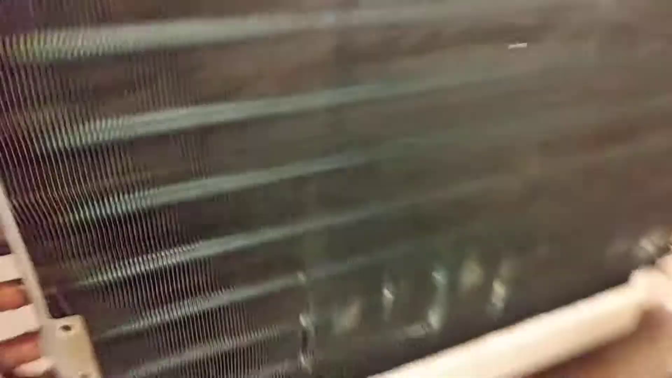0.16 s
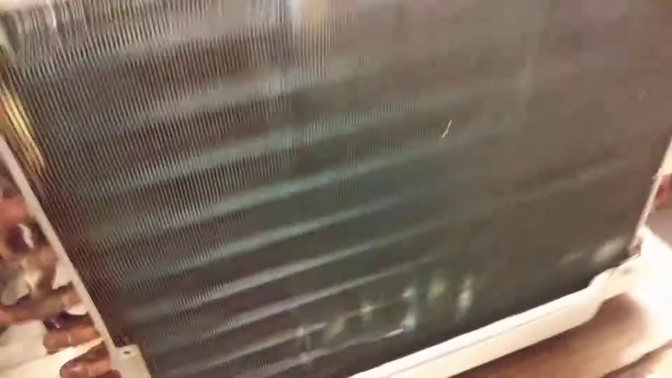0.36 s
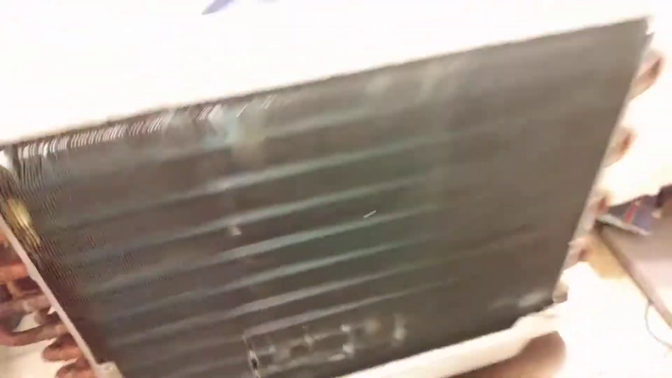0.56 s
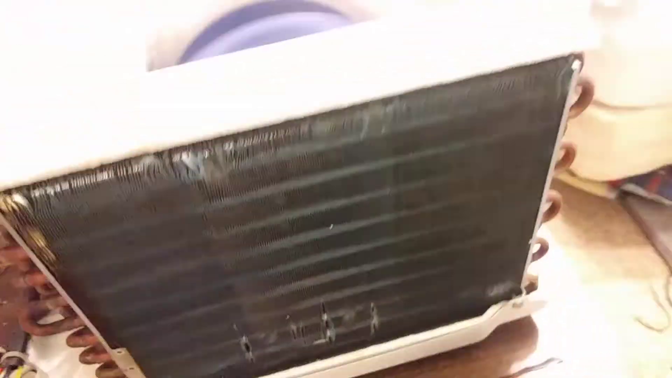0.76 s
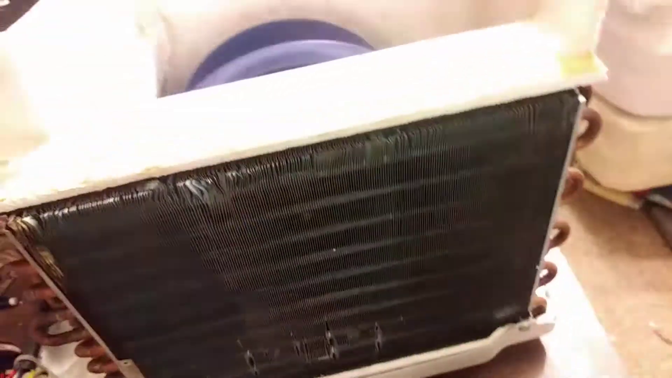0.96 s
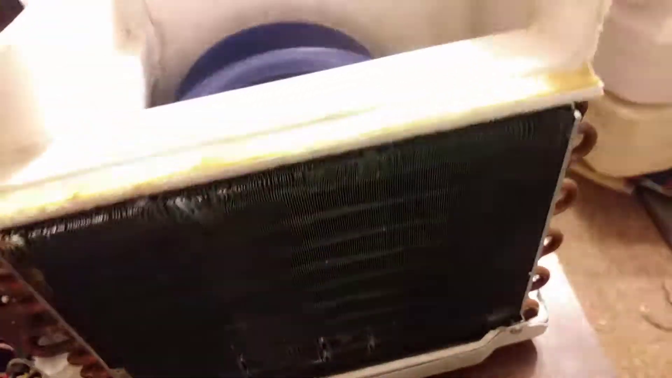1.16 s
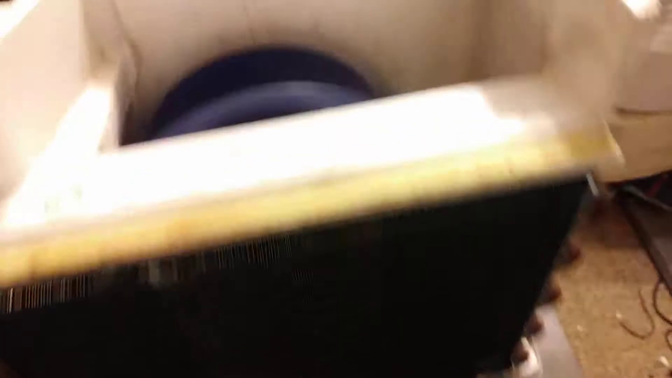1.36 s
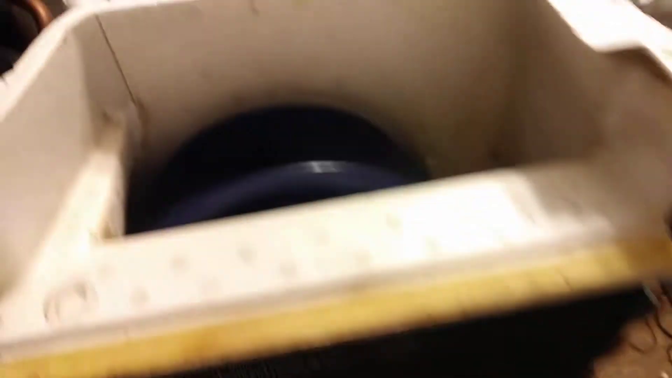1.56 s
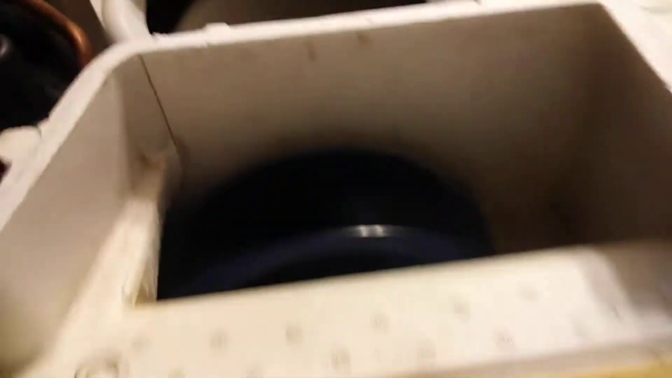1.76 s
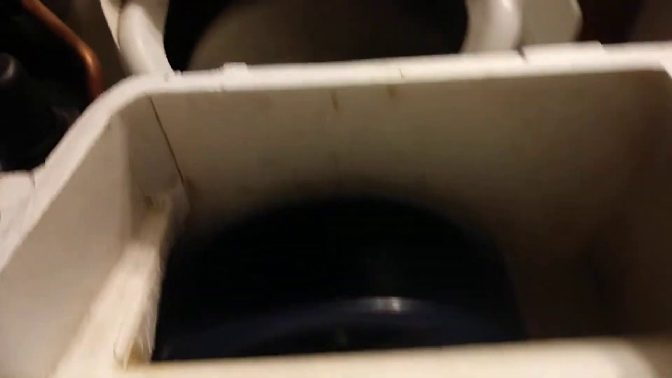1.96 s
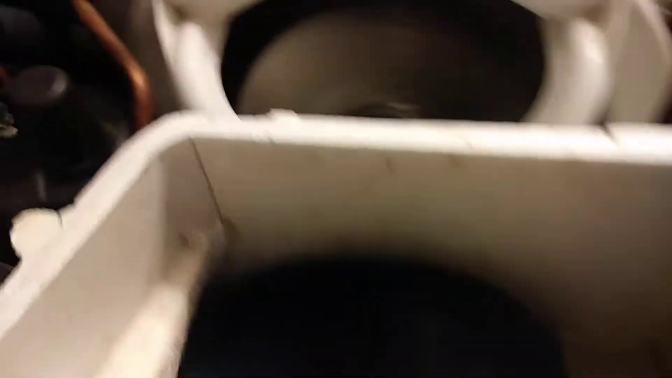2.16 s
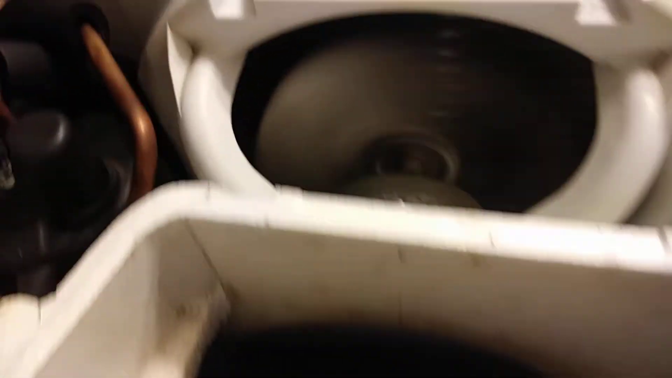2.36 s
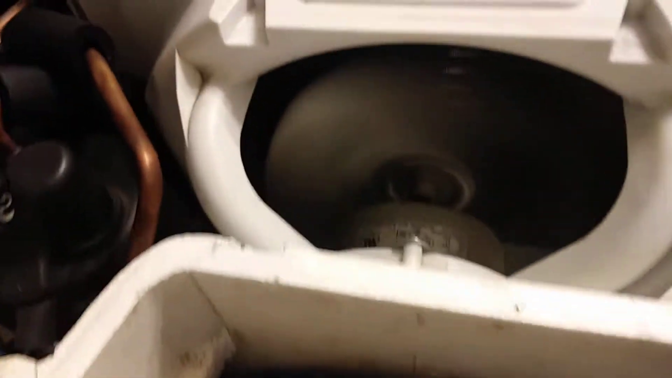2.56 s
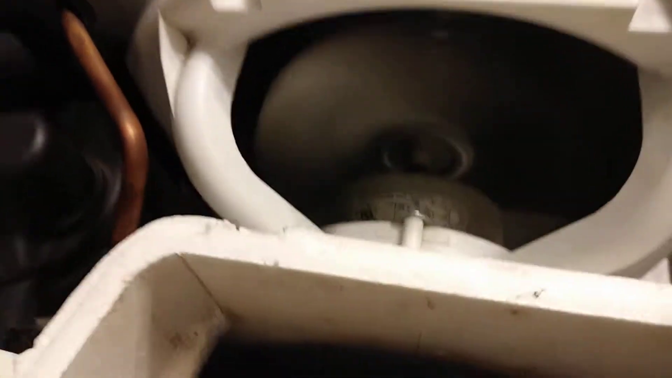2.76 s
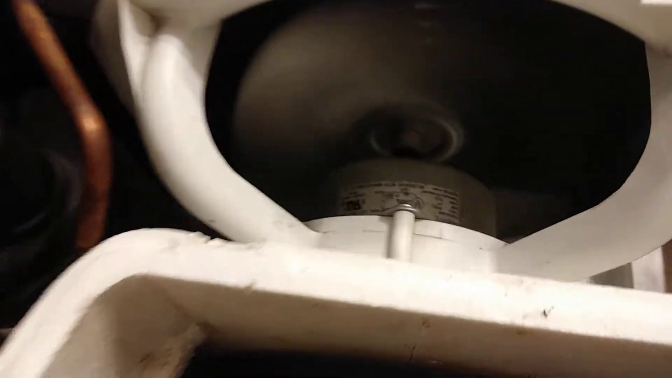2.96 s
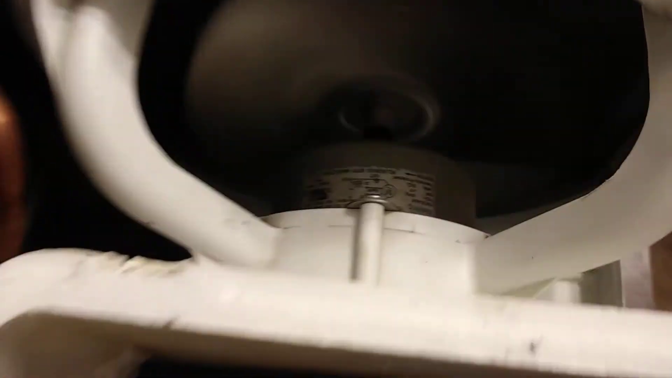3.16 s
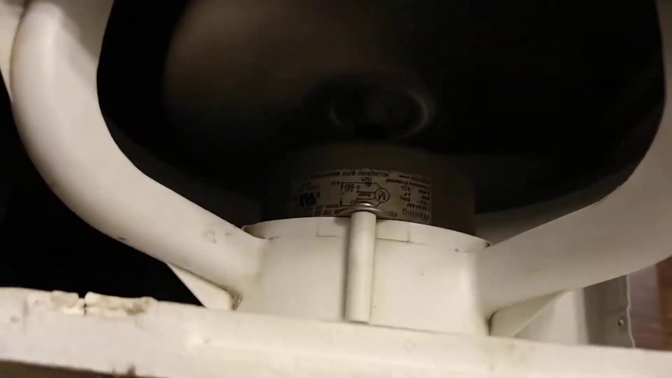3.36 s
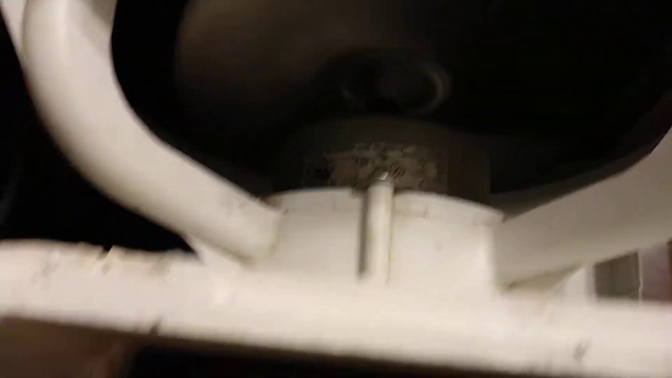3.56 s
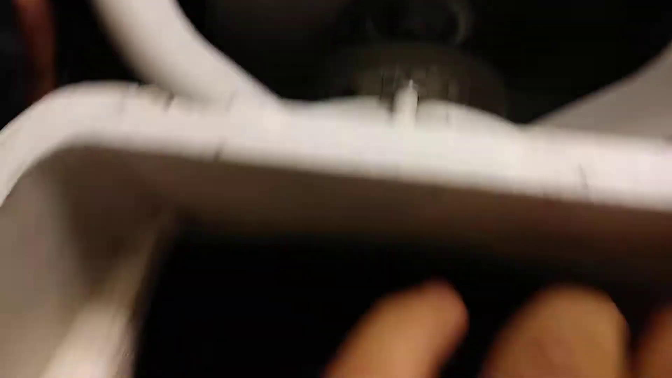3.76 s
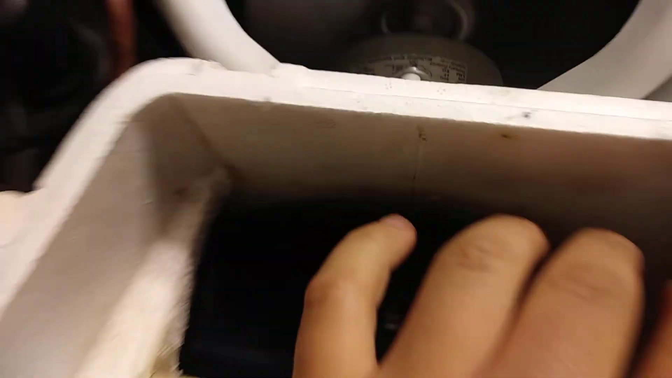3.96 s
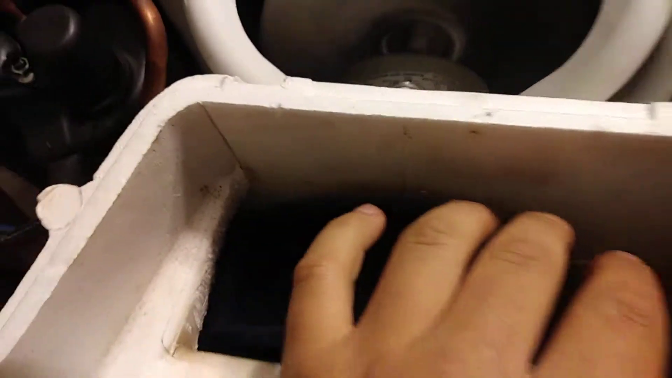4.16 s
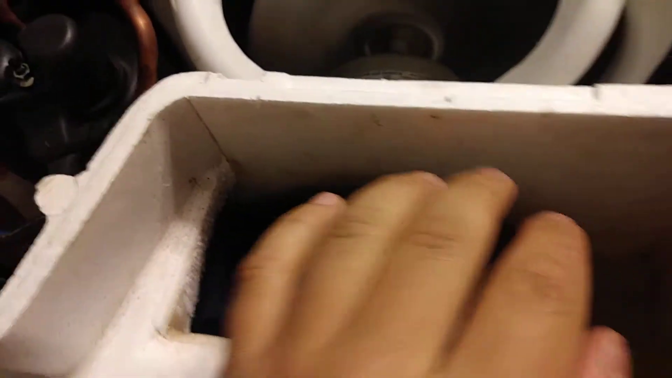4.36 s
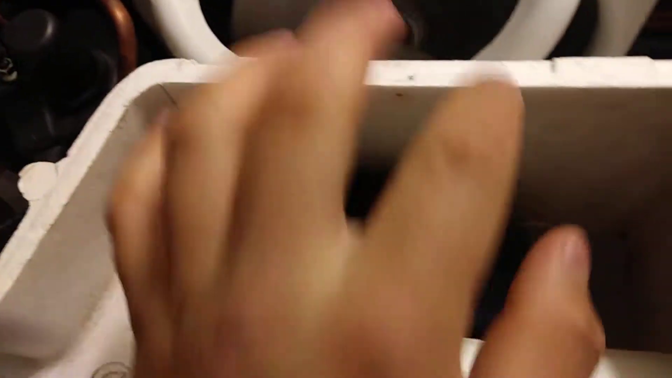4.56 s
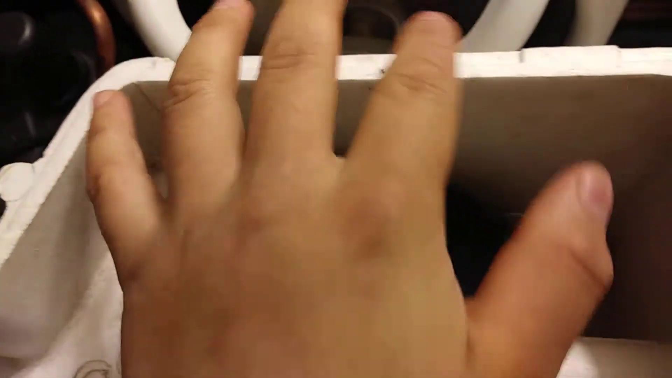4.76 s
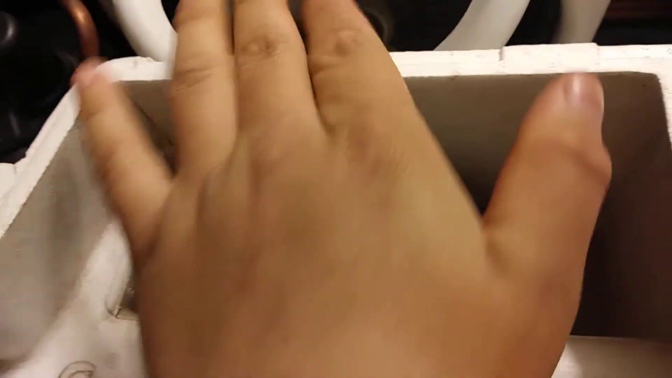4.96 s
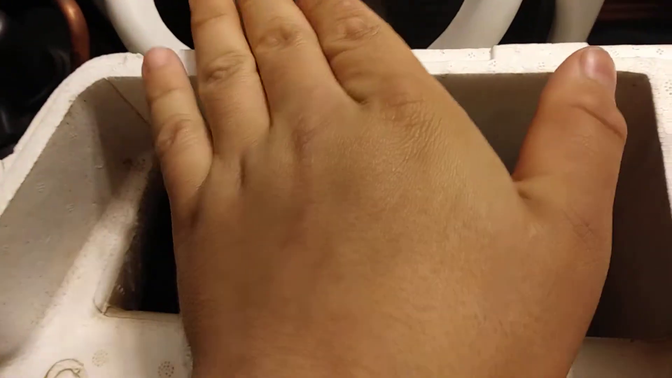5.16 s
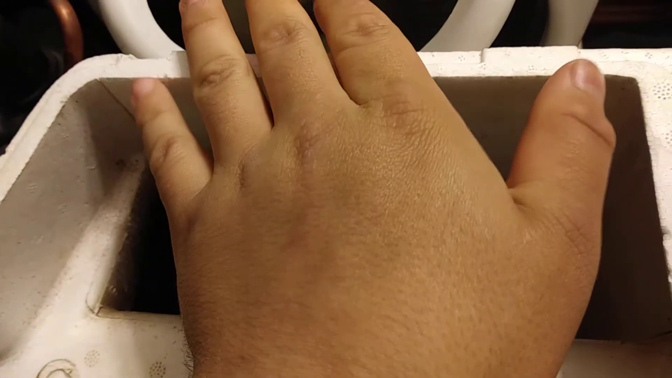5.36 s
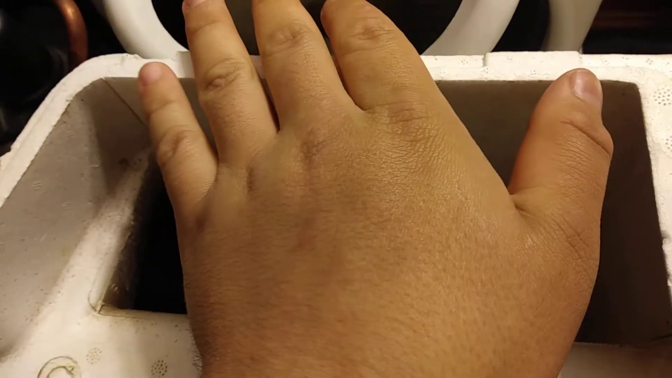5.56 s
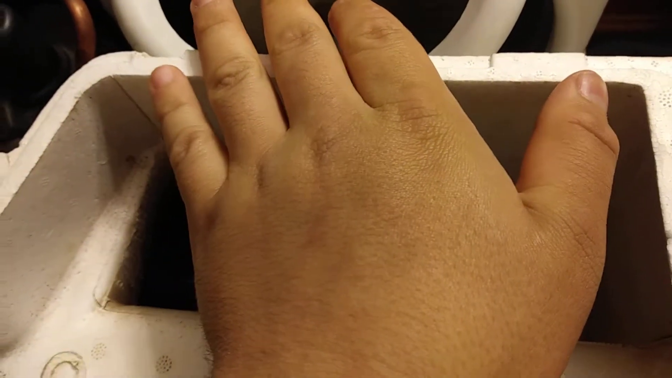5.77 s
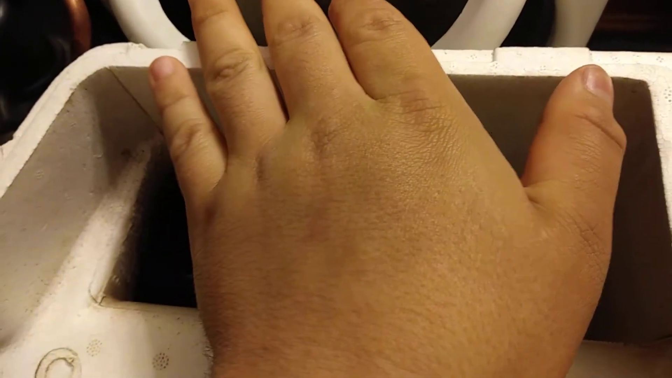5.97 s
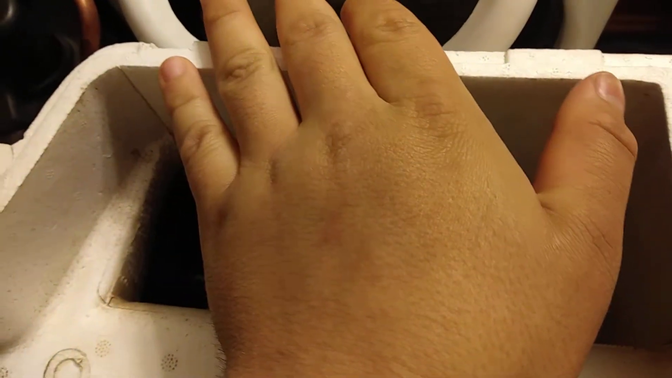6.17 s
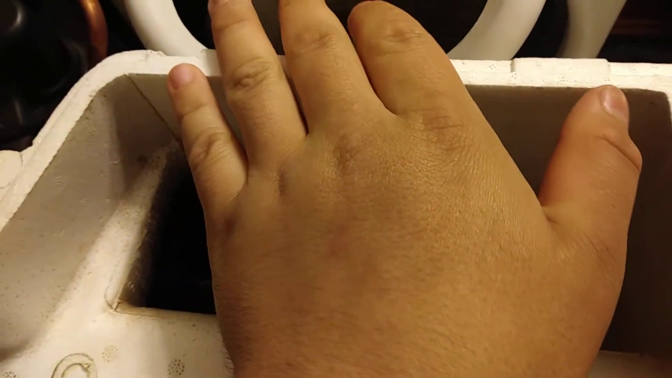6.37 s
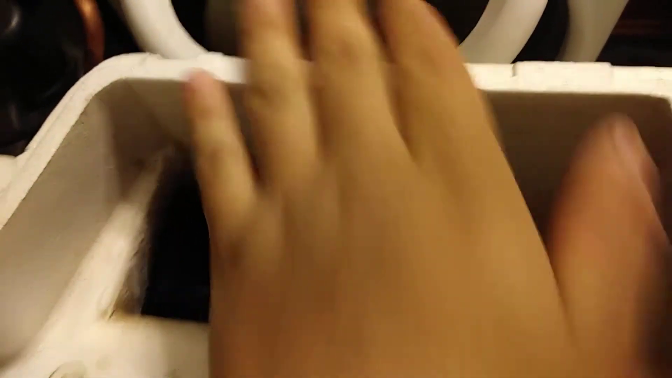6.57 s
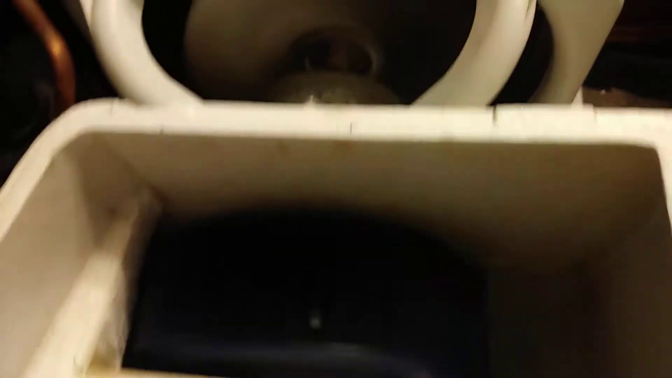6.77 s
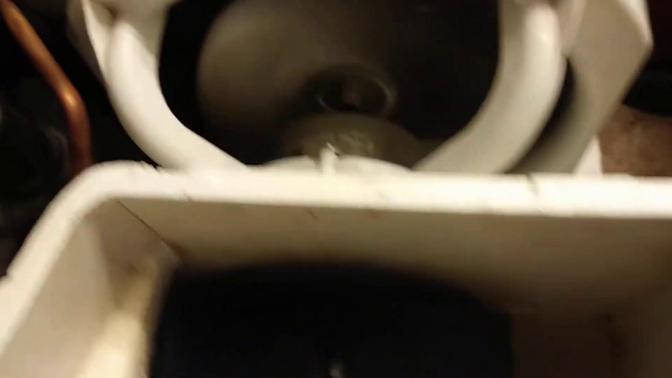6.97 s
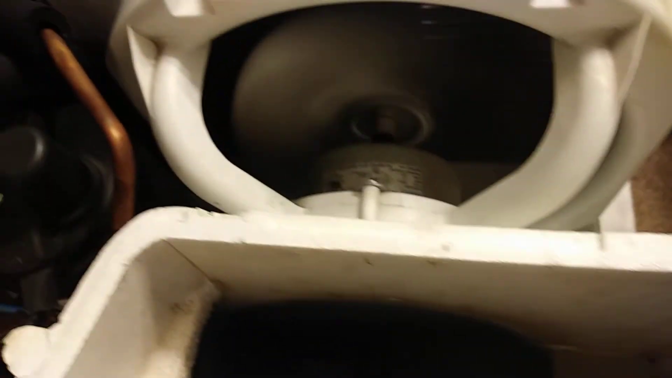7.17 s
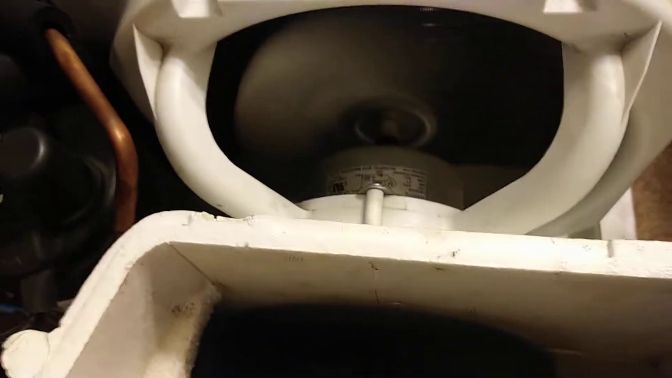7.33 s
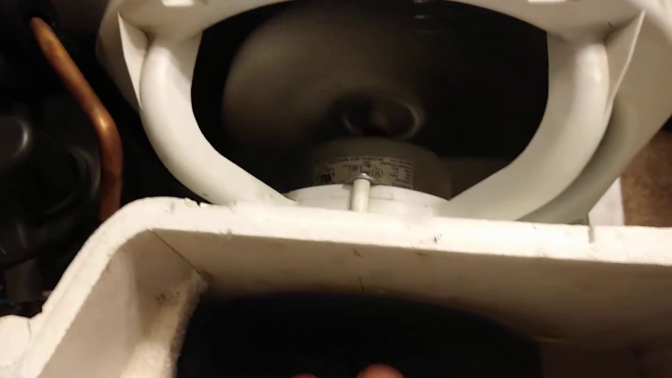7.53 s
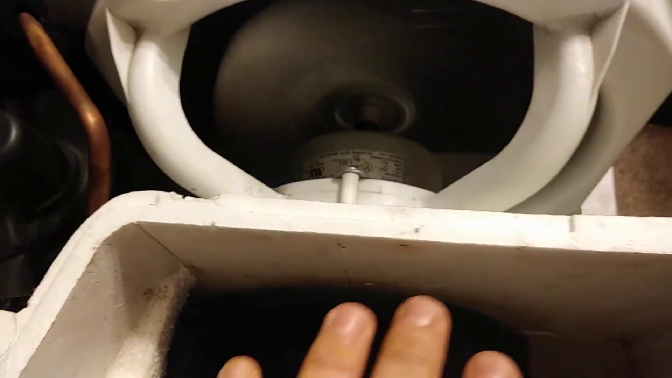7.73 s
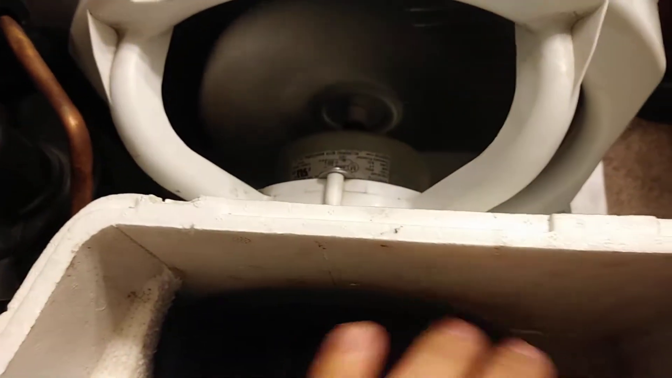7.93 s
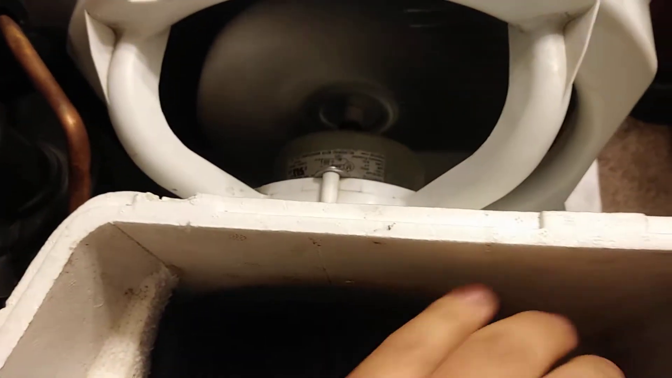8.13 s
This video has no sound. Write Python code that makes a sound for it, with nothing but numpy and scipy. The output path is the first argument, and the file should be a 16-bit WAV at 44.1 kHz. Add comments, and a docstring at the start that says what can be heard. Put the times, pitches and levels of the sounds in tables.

```python
"""An opened window air conditioner runs in a small room: knocks ring its casing, sines hum, noise hisses.
From 2.5 s the microphone dips into the blower's jet: gusts of shaped noise thump, roar and drive a limiter.
Near 6.5 s a hand covers the outlet, so the hiss drops, then slides off the plastic in two noise strokes.
From 7 s the jet buffets the microphone again, more weakly; the machine runs on to the end."""
import sys
import numpy as np
from scipy import signal
from scipy.fft import rfft, irfft, next_fast_len
from scipy.io import wavfile
from scipy.ndimage import uniform_filter1d, minimum_filter1d, map_coordinates

SR = 44100
rng = np.random.default_rng(int(sys.argv[2]) if len(sys.argv) > 2 else 0)


def dump_mix(stems):
    """Bounce the given channels to the path in sys.argv[1] as a 16-bit WAV at rate SR."""
    frames = np.atleast_2d(stems).T  # one column per channel
    limited = np.clip(frames, -1, 1)  # hard clip at full scale
    pcm = np.round(limited * 32767).astype(np.int16)
    wavfile.write(sys.argv[1], SR, pcm)


N = 366030
T = np.arange(N) / SR
SHAFT_HZ = 58.65
TURNS = np.arange(int(N / SR * SHAFT_HZ) + 1)

# "coil", "rim", "blower": levels beside the coil, over the rim, above the blower. All levels are relative.
# microphone path: (time [s], place [0 coil, 1 rim, 2 blower])
MIC_PATH = [(.3, 0.3), (1.05, 0.65), (1.4, 0.8), (1.65, 1.16), (2.1, 1.55), (4.2, 1.76), (5.5, 1.84),
            (6.6, 1.97), (7, 1.67), (8.25, 1.92)]
# hiss level, lower off the fins and under the hand; each source scales it: (time [s], level [dB])
FACING = [(0, -3.5), (.35, -11.5), (1.35, -8.5), (2.2, -1.5), (2.9, -7.5), (4.45, -3.5), (5.1, -6.5),
          (6.3, -8.5), (6.9, -3.5), (7.5, -4), (8.25, -7)]

# lighter knocks within a compressor turn: (place [turn], coil [dB], rim [dB], blower [dB])
KNOCKS = [(0.089, -12, -7.5, -4.5), (.185, 6, 1, 2), (0.268, -9, 1, -10.5), (.35, 2.5, -4, 0),
          (0.503, -3, -4, -2.5), (0.666, 1, 1, -3.5), (0.857, -16.5, -6, -7)]
# casing resonances: (centre [Hz], width [Hz], coil [dB], rim [dB], blower [dB])
CASING_MODES = [(1341, 330, -42, -28, -30.6), (1528, 153, -47.5, -38.5, -33.5),
                (1730, 147, -50, -47.5, -37), (2110, 35, -60, -58, -48), (2200, 80, -50, -52, -44),
                (2275, 65, -44, -47, -54), (2660, 90, -53, -51, -52), (3460, 200, -52, -52.5, -64)]
# broad compressor clatter: (frequency [Hz], density [dB per Hz])
CLATTER_SPECTRUM = [(80, -61), (150, -26), (240, -25.5), (400, 1.5), (580, 4.5), (730, -3.5), (1000, 5.5),
                    (1950, -2.5), (2700, -6), (3800, -18.5), (4900, -17), (6500, -33), (9000, -43.5),
                    (15000, -57)]
# shell resonances, each struck once a turn at its own place in the turn: (place [turn], centre [Hz], width
# [Hz], coil [dB], rim [dB], blower [dB])
SHELL_MODES = [(.205, 961, 224, -24.5, -34, -29.5), (.21, 968, 60, -42, -50, -37),
               (.59, 1019, 253, -42, -36, -38.5), (.2, 845, 90, -34, -45, -52),
               (.2, 700, 90, -42, -52, -55), (.2, 1500, 90, -52, -48, -38), (.1, 1705, 220, -50, -44, -31),
               (.22, 2246, 160, -42, -55, -56)]
# stroke timing: alternate turns early and late, random scatter, slow drift
LIMP_S, JITTER_S, DRIFT_S = 0.00012, 0.00013, 0.00019
# discharge valve: place in the turn, half length, levels at coil, rim and blower
VALVE_PLACE_TURN, VALVE_HALF_S, VALVE_DB = 0.057, 0.00071, (-54, -53, -43.5)
# valve gas: (frequency [Hz], density [dB per Hz])
VALVE_SPECTRUM = [(1900, -2), (2500, 1), (4200, -3.5), (6500, -16), (9500, -39)]
# compressor hum: (multiple of shaft speed, coil [dB], rim [dB], blower [dB])
HUM_LINES = [(4, -54, -61, -61), (7, -43, -49.5, -52), (8, -48, -55, -53), (9, -56, -47, -46),
             (10, -55, -42, -39.5), (11, -48, -50, -50), (14, -44, -43, -49), (16, -52, -52, -45.5)]
# narrow fan whines: (centre [Hz], width [Hz], coil [dB], rim [dB], blower [dB])
FAN_WHINES = [(544, 6.6, -45, -49.5, -52), (954, 14, -34, -43.5, -41)]
# air through the fins: (frequency [Hz], density [dB per Hz])
FAN_SPECTRUM = [(80, -39.5), (130, -33), (170, -17.5), (260, 3), (600, 7.5), (1000, 12.5), (1500, 15.5),
                (2000, 4), (3000, 1), (4000, -6), (5200, -9.5), (6600, -17), (8000, -20), (10000, -41),
                (13000, -36), (15700, -63)]

# stays in the jet: (enter [s], leave [s], buffeting level [dB])
JET_PASSES = [(2.492, 3.188, -20), (3.378, 3.508, -24.5), (3.64, 3.86, -21), (4.31, 4.326, -39.5),
              (5.175, 5.208, -44.5), (7.02, 7.816, -27.5)]
JET_RISE_DB_PER_S, JET_FALL_DB_PER_S = 88, 72
# brushes with the jet's fast core: (time [s], half length [s], air speed [0-1])
JET_CORES = [(2.969, 0.33, 0.76), (3.398, 0.024, 0.96), (3.674, 0.13, 0.67)]
# flow stalls: (time [s], half length [s], depth [dB])
FLOW_STALLS = [(2.456, .01, 16), (2.497, 0.014, 13), (2.579, 0.0051, 22), (2.638, 0.0087, 5),
               (2.709, 0.011, 12), (2.856, 0.0036, 12), (2.98, 0.0024, 12), (3.18, 0.0037, 11),
               (3.259, 0.02, 13), (3.328, 0.018, 17), (3.423, 0.028, 7.5), (3.55, 0.008, 11),
               (3.753, 0.0085, 5), (3.83, 0.011, 8), (7.055, 0.065, 6), (7.145, 0.0077, 19),
               (7.27, 0.019, 6), (7.328, 0.0083, 7), (7.455, .018, 7), (7.576, 0.0087, 5),
               (7.674, 0.014, 4), (7.72, 0.0072, 6), (7.777, 0.014, 10), (7.827, .01, 7)]
# eddies hitting the microphone: (time [s], peak [dB], swell time [s], sharpness [0-1])
EDDIES = [(2.222, -8.5, 0.0021, 0.67), (2.391, -6, 0.0021, 0), (2.447, -7, 0.0022, 0.28),
          (2.462, 1.5, 0.0021, 0), (2.518, -0.5, 0.00083, 0.64), (2.534, -1, 0.0022, .2),
          (2.556, -6.5, 0.0023, 0.04), (2.58, 6, 0.0028, 0.48), (2.61, -25, 0.0018, 0.1),
          (2.65, 4, 0.0039, 0.4), (2.681, 4, 0.002, 0.5), (2.721, 4, 0.0033, 0.54), (2.731, 2, 0.0013, 1),
          (2.757, -4, 0.0033, 0.54), (2.782, 2, 0.0013, 0.7), (2.819, -3, 0.00094, .7),
          (2.835, 2, 0.0022, 0.75), (2.85, 6.5, 0.0009, 0.6), (2.901, 5, 0.0025, 0.7),
          (2.91, -2, 0.0013, 0.7), (2.945, 0, 0.0022, 0.3), (2.986, -3, 0.0016, 1),
          (3.001, 0.5, 0.0021, 0.95), (3.025, 1.5, 0.0013, 0.59), (3.061, 0, .002, 0.56),
          (3.109, -7, 0.0012, 0.6), (3.124, 0, 0.0027, 0.88), (3.145, -0.5, 0.0019, 0.75),
          (3.167, -1, 0.0014, 0.56), (3.188, 3.5, 0.0019, 0.37), (3.217, 3, 0.0029, 0.42),
          (3.24, -13, 0.0035, 0.36), (3.276, -1, 0.0027, 0.4), (3.333, -5.5, 0.0022, 0.57),
          (3.359, -6, 0.0024, 0.4), (3.398, 5, 0.0034, 0.66), (3.459, -9.5, 0.0019, .3),
          (3.489, 2, 0.0036, 0.6), (3.511, 5.5, 0.0019, 0.47), (3.531, -8, 0.0022, 0.4),
          (3.548, -16, 0.0024, 0.4), (3.571, -6, 0.0022, 0.3), (3.584, 10, 0.0035, 0.54),
          (3.602, 2.5, 0.00065, 0.8), (3.625, 5.5, 0.0018, 0.37), (3.636, 3.5, 0.0018, 1),
          (3.66, 0.5, 0.0011, .85), (3.668, 0, 0.0015, 0.8), (3.698, -2.5, 0.0015, 0.84),
          (3.715, 1, 0.0063, 0.53), (3.765, 1.5, 0.0025, 0.1), (3.8, -0.5, 0.0034, 0.1),
          (3.838, -7, .003, 0.3), (3.855, 1, 0.0016, 0.5), (3.872, -11, 0.0038, 0),
          (3.892, -5.5, 0.0022, 0.44), (3.974, -10.5, 0.0035, 0.1), (4.046, -7.5, 0.0016, 0.15),
          (4.315, -21.5, 0.0035, 0.1), (5.18, -23, 0.0063, 0), (7.094, -10, 0.0013, 0.77),
          (7.119, -3.5, 0.0011, 0.5), (7.16, -15.5, 0.0022, 0.2), (7.206, -2.5, 0.0033, 0),
          (7.307, -9.5, 0.0022, 0), (7.355, -1, 0.002, 0.2), (7.364, -2, 0.0013, 0.3),
          (7.392, -8, 0.0019, 0.34), (7.414, -7.5, 0.0058, 0.3), (7.484, -10.5, 0.0041, 0.3),
          (7.54, -9.5, 0.0019, 0.25), (7.628, -13, .003, 0.1), (7.65, -9.5, 0.0017, 0),
          (7.696, -5.5, 0.0022, 0.18), (7.739, -5, 0.0014, 0.18), (7.796, -9, 0.0032, 0.3),
          (7.881, -10.5, 0.0026, 0)]
# turbulence from slow air to fast: (frequency [Hz], density [dB per Hz])
RUMBLE_SPECTRUM = [(50, -32), (90, -18.5), (140, -26), (230, -5), (340, 0.5), (520, -2), (750, -11),
                   (1100, -26.5), (2000, -41.5), (5000, -68)]
ROAR_SPECTRUM = [(100, -29), (250, -7), (500, 5), (800, 1.5), (1200, -5.5), (1900, -22.5), (3200, -51),
                 (5000, -55), (9000, -64)]
CRACKLE_SPECTRUM = [(500, 4.5), (1200, 12), (2200, 4), (3500, -8.5), (4800, -27), (9000, -62.5)]

# palm sliding off the rim: (start [s], length [s], level [dB], extra treble [dB])
PALM_STROKES = [(6.522, 0.128, -34.5, 0), (6.685, 0.048, -42, 7.5)]
STROKE_SWELL_DB, STROKE_EDGE_DB_PER_S = 8, 900
# skin on plastic: (frequency [Hz], density [dB per Hz])
SKIN_SPECTRUM = [(1500, 24.5), (3000, 26.5), (4700, 19), (6500, 12), (8000, 10.5), (10000, -3), (13000, -3),
                 (15700, -14)]

# narrow dips of the microphone: (centre [Hz], width [Hz])
MIC_DIPS = [(7150, 530), (9480, 180)]
MIC_TOP_HZ = 15730


def amp(db):
    """Decibels to gain."""
    return 10 ** (np.asarray(db) / 20)


def unit(x):
    """Scale to rms 1."""
    return x / np.sqrt(np.mean(x ** 2) + 1e-20)


def noise():
    """Fresh white noise."""
    return rng.standard_normal(N)


def curve(rows):
    """Interpolate (time [s], value) rows to one value per sample."""
    time_s, value = np.transpose(rows)
    return np.interp(T, time_s, value)


def wobble(rate_hz):
    """Smooth random curve with rate_hz knots a second."""
    knots = rng.standard_normal(int(N * rate_hz / SR) + 4)
    return map_coordinates(knots, [T * rate_hz])


def bump(time_s, half_s):
    """Bell of height 1 around a moment."""
    return np.exp(-((T - time_s) / half_s) ** 2)


def held_db(start_s, end_s, rise_db_per_s, fall_db_per_s):
    """Attack, hold and release: 0 dB from start to end."""
    return -rise_db_per_s * np.maximum(start_s - T, 0) - fall_db_per_s * np.maximum(T - end_s, 0)


def heard_db(place_dbs):
    """Level along the microphone path, from the levels at its three places."""
    return np.interp(curve(MIC_PATH), np.arange(len(place_dbs)), place_dbs)


def filtered(x, response):
    """Apply a gain that is a function of frequency."""
    size = next_fast_len(N + SR // 2)
    return irfft(rfft(x, size) * response(np.fft.rfftfreq(size, 1 / SR)), size)[:N]


def coloured(x, spectrum):
    """Shape x by a spectrum table, fading beyond its ends, at rms 1."""
    f, db = np.transpose(spectrum)

    def response(hz):
        """Interpolated gain over log frequency, times the fade at the ends."""
        ends = np.minimum(hz / f[0], f[-1] / (hz + 1)).clip(0, 1) ** 2
        return ends * amp(np.interp(np.log(hz + 1), np.log(f), db))
    return unit(filtered(x, response))


def ringing(x, hz, width_hz):
    """Pass x through a steep-sided resonance, at rms 1."""
    edges_hz = np.clip([hz - width_hz / 2, hz + width_hz / 2], 20, SR / 2 - 1)
    return unit(signal.sosfilt(signal.butter(2, edges_hz, 'bandpass', fs=SR, output='sos'), x))


def strikes(place_turn, slack_s, scatter_db):
    """One impulse per compressor turn, early or late by slack_s."""
    times_s = (TURNS + place_turn) / SHAFT_HZ + slack_s
    sizes = amp(scatter_db * rng.standard_normal(len(TURNS)))
    return np.bincount(np.abs(times_s * SR).astype(int), sizes, N)[:N]


def knocking():
    """The same knocks every turn, weighted by microphone place; each leaves a short rattle envelope."""
    turn_slack_s = 0.00022 * rng.standard_normal(len(TURNS))
    blows = np.zeros(N)
    for place_turn, *dbs in KNOCKS:
        slack_s = turn_slack_s + 0.00009 * rng.standard_normal(len(TURNS))
        blows += amp(heard_db(dbs)) * strikes(place_turn, slack_s, scatter_db=0.7)
    # energy decays with a 1 ms time constant
    energy = signal.lfilter([1], [1, -np.exp(-1 / (0.001 * SR))], blows ** 2)
    return -unit(blows), unit(np.sqrt(energy))


def compressor(facing_db):
    """Knocks and rattles ring the casing resonances and spill a broad clatter."""
    blows, rattle = knocking()
    drive = blows + 0.25 * rattle * noise()
    casing = sum(amp(heard_db(dbs)) * ringing(drive, hz, width_hz)
                 for hz, width_hz, *dbs in CASING_MODES)
    clatter = coloured(blows + 0.7 * rattle * noise(), CLATTER_SPECTRUM)
    return casing + amp(-26 + 0.86 * facing_db) * clatter


def throb():
    """Each shell resonance is struck once a turn at its own place; all strokes share one timing."""
    drift = np.interp(TURNS / SHAFT_HZ, T, wobble(6))
    jitter = rng.standard_normal(len(TURNS))
    slack_s = LIMP_S * (-1) ** TURNS + JITTER_S * jitter + DRIFT_S * drift
    return sum(amp(heard_db(dbs)) * ringing(strikes(place_turn, slack_s, scatter_db=0.5), hz, width_hz)
               for place_turn, hz, width_hz, *dbs in SHELL_MODES)


def valve(facing_db):
    """The discharge valve spits a short noise puff of gas every turn."""
    offset_turn = (T * SHAFT_HZ - VALVE_PLACE_TURN + 0.5) % 1 - 0.5
    puffs = np.exp(-(offset_turn / (VALVE_HALF_S * SHAFT_HZ)) ** 2) * noise()
    return amp(heard_db(VALVE_DB) + 0.5 * facing_db) * coloured(puffs, VALVE_SPECTRUM)


def moving_gain(dbs):
    """Sine gain (rms 1 at 0 dB) along the microphone path, with slow random swells."""
    return np.sqrt(2) * amp(heard_db(dbs) + 1.6 * wobble(2.5))


def hum():
    """Shaft harmonics share one wavering phase; fan whines wander in frequency."""
    shaft_rad = 2 * np.pi * SHAFT_HZ * T + 0.13 * wobble(2.3)
    tones = np.zeros(N)
    for multiple, *dbs in HUM_LINES:
        tones += moving_gain(dbs) * np.sin(multiple * shaft_rad + rng.uniform(0, 2 * np.pi))
    for hz, width_hz, *dbs in FAN_WHINES:
        pitch_hz = hz + width_hz / 2 * wobble(2 * width_hz)
        tones += moving_gain(dbs) * np.sin(2 * np.pi * np.cumsum(pitch_hz) / SR)
    return tones


def fan(facing_db):
    """Air rushes through the fins; its treble is directional, so it follows facing_db most."""
    rush = coloured(noise(), FAN_SPECTRUM)
    treble = filtered(rush, lambda hz: 1 - 1 / (1 + (hz / 4200) ** 4))
    body = rush - treble
    return amp(-28.5) * (amp(0.12 * facing_db) * body + amp(1.48 * facing_db) * treble)


def buffeting(speed):
    """Lumpy turbulence at the microphone port; faster air adds roar, then crackle."""
    jet_db = np.max([db + held_db(enter_s, leave_s, JET_RISE_DB_PER_S, JET_FALL_DB_PER_S)
                     for enter_s, leave_s, db in JET_PASSES], axis=0)
    stall_db = sum(db * bump(time_s, half_s) for time_s, half_s, db in FLOW_STALLS)
    lumps = wobble(300).clip(-2, 1)
    rumble = amp(4) * coloured(amp(5.6 * lumps) * noise(), RUMBLE_SPECTRUM)
    roar = amp(17.5) * speed * coloured(amp(5.5 * lumps) * noise(), ROAR_SPECTRUM)
    crackle = amp(7) * speed ** 2 * coloured(amp(13 * lumps) * noise(), CRACKLE_SPECTRUM)
    return amp(jet_db - stall_db) * (rumble + roar + crackle)


def eddies(gain_db, crack_db, low_cut_hz):
    """Each eddy is a noise puff of a few milliseconds: blunt ones thump, sharp ones crack."""
    t = np.arange(SR // 20) / SR
    rumble = coloured(noise(), RUMBLE_SPECTRUM)
    roar = coloured(noise(), ROAR_SPECTRUM)
    crackle = amp(crack_db) * coloured(noise(), CRACKLE_SPECTRUM)
    puffs = np.zeros(N)
    for time_s, peak_db, swell_s, sharp in EDDIES:
        start = round(time_s * SR)
        span = slice(start, start + len(t))
        air = (1 - sharp) * rumble[span] + (0.28 + 2.1 * sharp) * roar[span] + sharp ** 4 * crackle[span]
        puff = t * np.exp(-t / swell_s) * air
        puffs[span] += amp(peak_db + gain_db) * puff / np.abs(puff).max()
    return signal.sosfilt(signal.butter(2, low_cut_hz, 'highpass', fs=SR, output='sos'), puffs)


def palm_stroke(start_s, length_s, db, bright_db):
    """Skin noise swells as the palm presses harder, with quick edges and a treble lift."""
    swell_db = STROKE_SWELL_DB * ((T - start_s) / length_s - 1).clip(-1, 0)
    edge_db = held_db(start_s, start_s + length_s, STROKE_EDGE_DB_PER_S, STROKE_EDGE_DB_PER_S)
    # lift: half of bright_db in the lows, toward 1.5 times above 9.5 kHz
    skin = filtered(coloured(noise(), SKIN_SPECTRUM),
                    lambda hz: amp(bright_db * (1.5 - 1 / (1 + (hz / 9500) ** 4))))
    return amp(db + swell_db + edge_db) * skin


def hand():
    """Dry skin brushes over the plastic rim with a fluttering level; the quicker stroke is brighter."""
    return amp(1.4 * wobble(79)) * sum(palm_stroke(*row) for row in PALM_STROKES)


def room(x, t60_s):
    """Short decaying wall reflections; two tails are mixed anew as the microphone moves."""
    t = np.arange(SR // 3) / SR
    tails = rng.standard_normal((2, len(t))) * amp(-60 * t / t60_s) * (t > 0.004)
    here, there = (signal.fftconvolve(x, tail / np.linalg.norm(tail))[:N] for tail in tails)
    mix_rad = np.pi * curve(MIC_PATH) + wobble(2)
    return np.cos(mix_rad) * here + np.sin(mix_rad) * there


def scene():
    """The machine in its room, plus wind and hand at the microphone."""
    facing_db = curve(FACING)
    machine = compressor(facing_db) + valve(facing_db) + fan(facing_db)
    tones = throb() + hum()
    speed = sum(top * bump(time_s, half_s) for time_s, half_s, top in JET_CORES)
    wind = buffeting(speed) + eddies(gain_db=1, crack_db=8, low_cut_hz=195)
    walls = amp(-13) * room(machine, t60_s=0.2)
    return (machine + tones + wind + hand() + walls)[None]


def limited(x, threshold, recovery_db_per_s):
    """Gain drops within a millisecond around a peak over the threshold, then recovers steadily."""
    over_db = 20 * np.log10(np.maximum(np.abs(x) / threshold, 1))
    peak_db = -minimum_filter1d(-over_db, size=14)
    ramp_db = recovery_db_per_s * T
    cut_db = np.maximum.accumulate(peak_db + ramp_db) - ramp_db
    return x * amp(-uniform_filter1d(cut_db, size=40))


def record(dry):
    """Low cut, microphone dips, limiter, rounding of the remaining peaks, band limit."""
    x = signal.sosfilt(signal.butter(4, 135, 'highpass', fs=SR, output='sos'), dry[0])
    for hz, width_hz in MIC_DIPS:
        x = signal.lfilter(*signal.iirnotch(hz, hz / width_hz, fs=SR), x)
    x = limited(x, threshold=0.52, recovery_db_per_s=330)
    x = x / (1 + np.abs(x / 0.54) ** 16) ** (1 / 16)
    return signal.sosfilt(signal.ellip(12, 0.1, 80, MIC_TOP_HZ, fs=SR, output='sos'), x)[None]


dry = scene()
out = record(dry)
dump_mix(out)
```